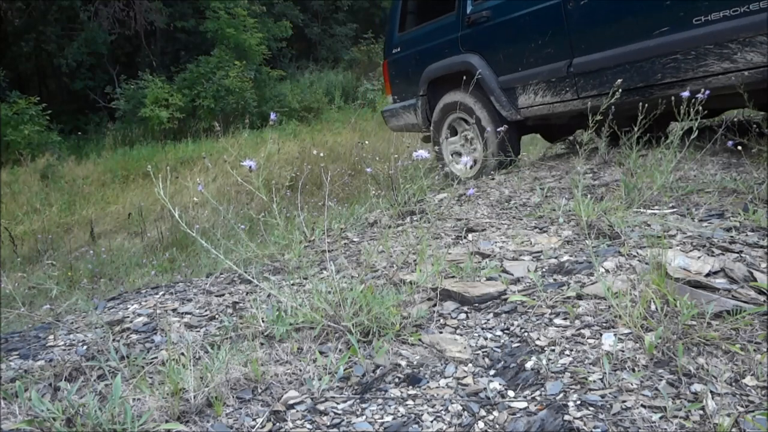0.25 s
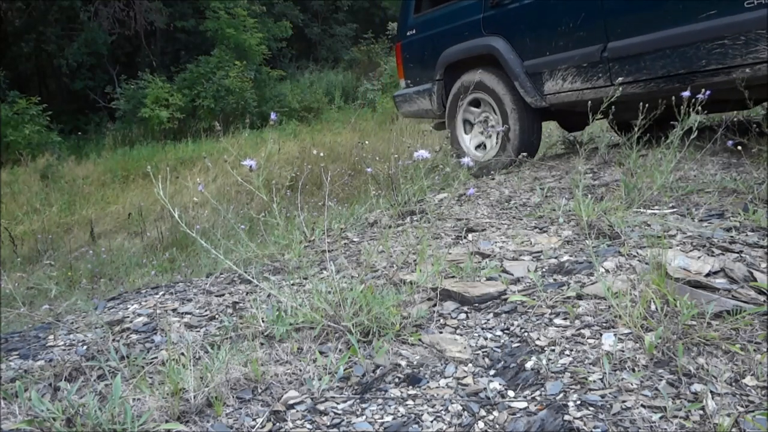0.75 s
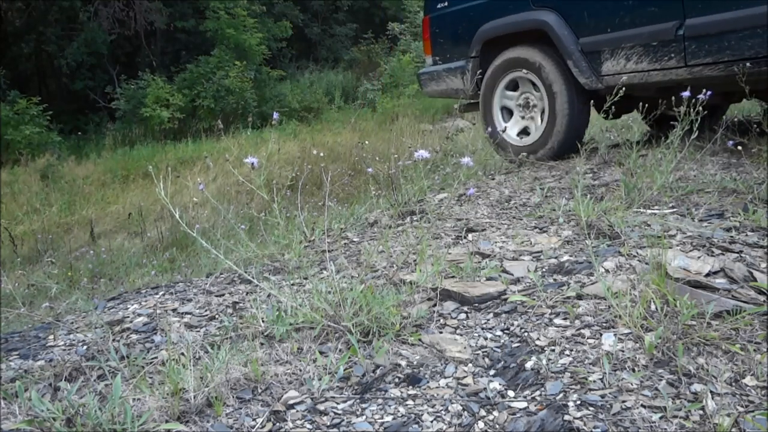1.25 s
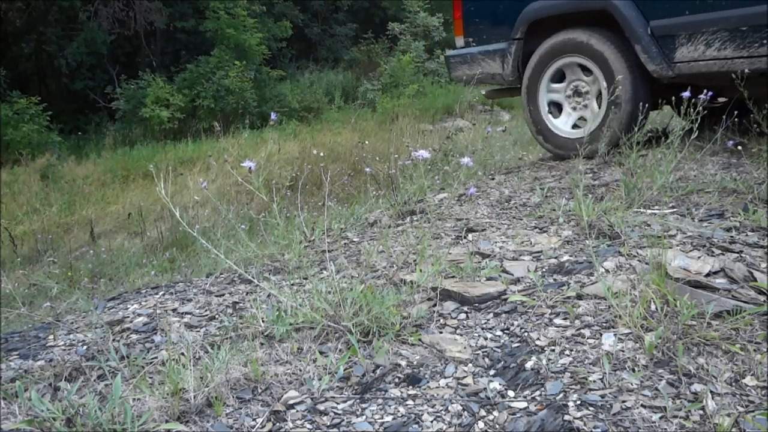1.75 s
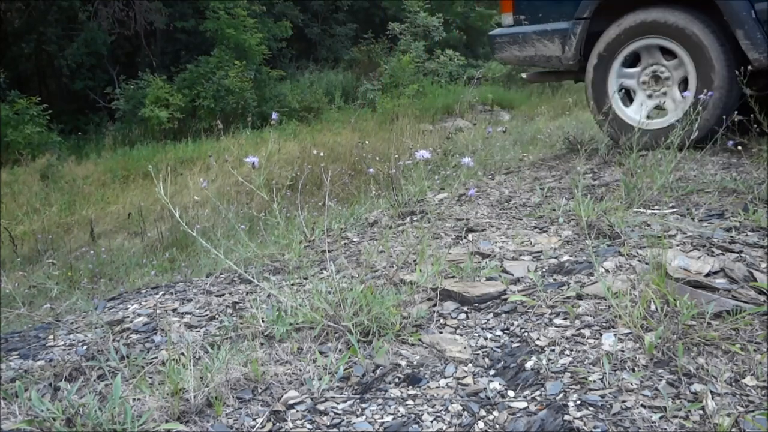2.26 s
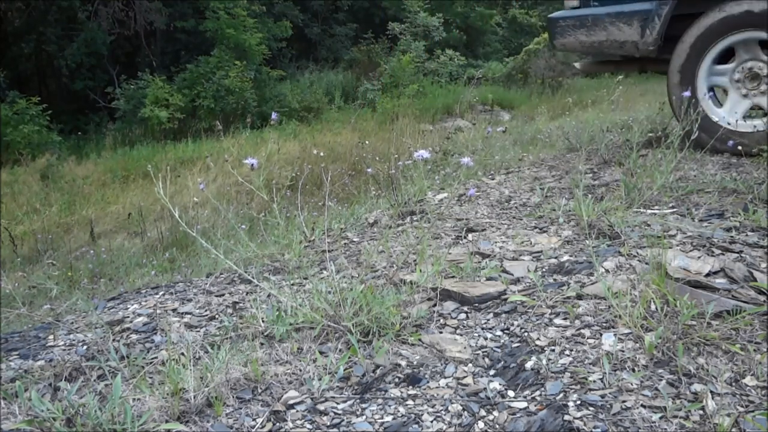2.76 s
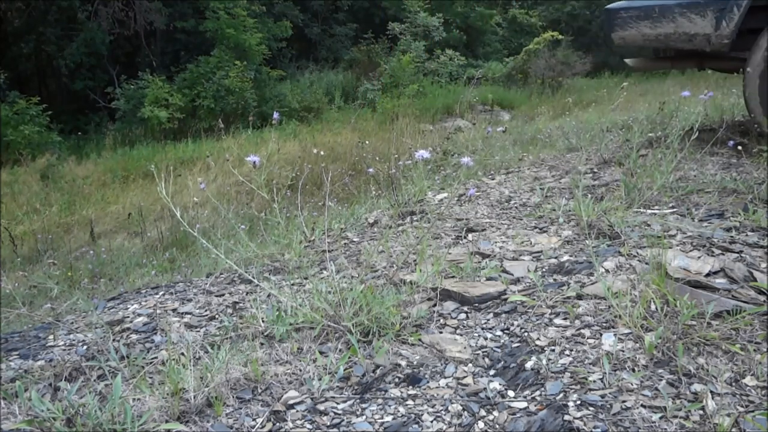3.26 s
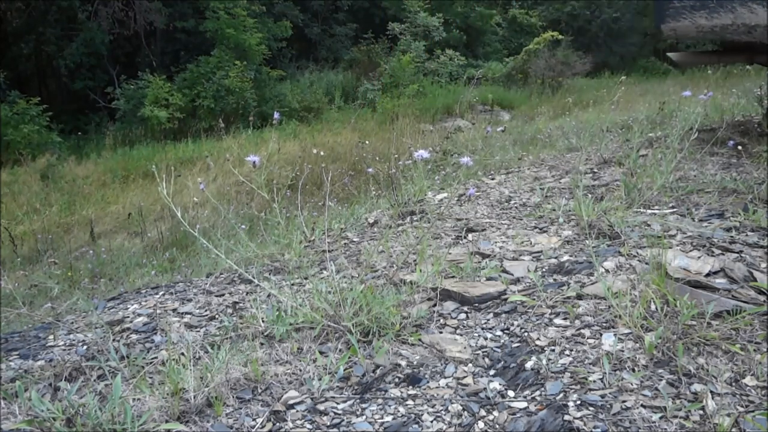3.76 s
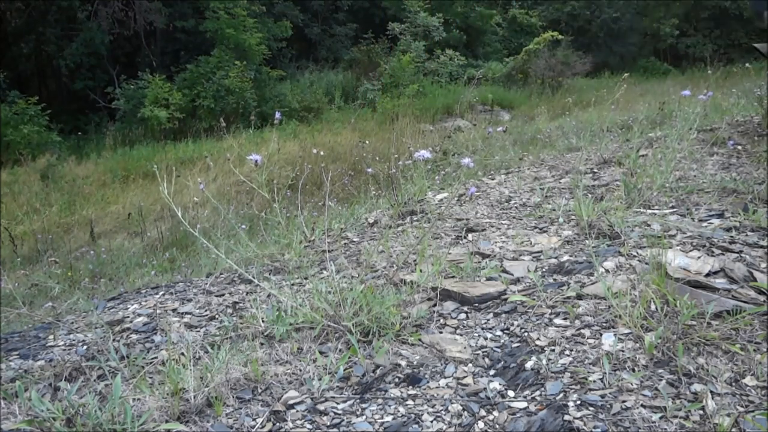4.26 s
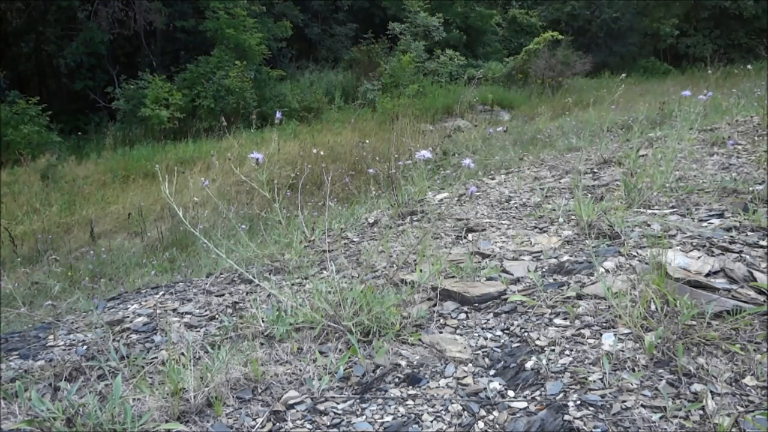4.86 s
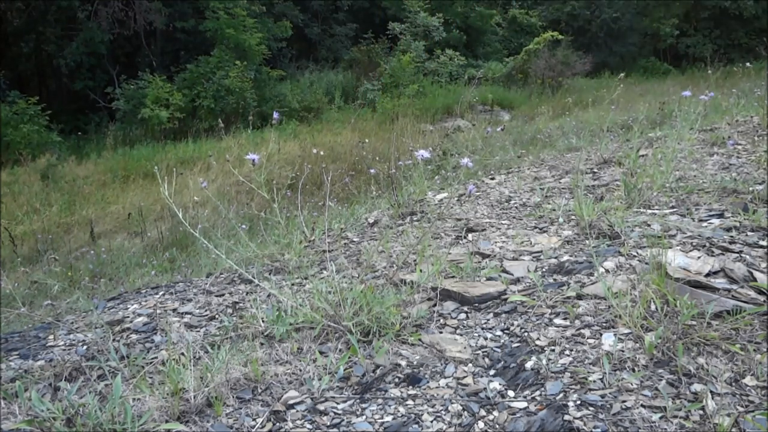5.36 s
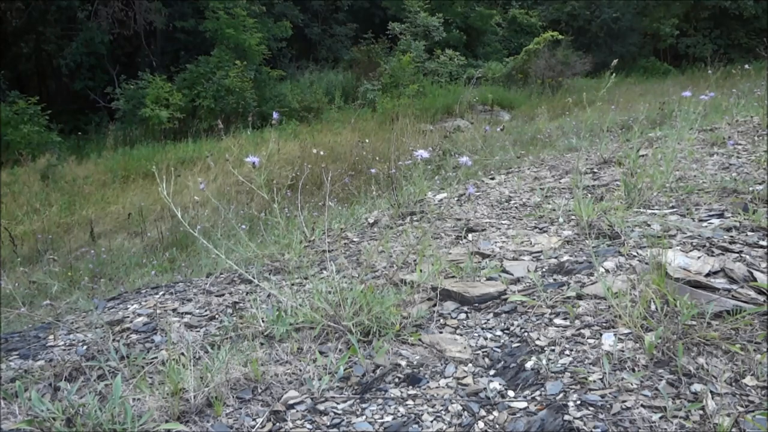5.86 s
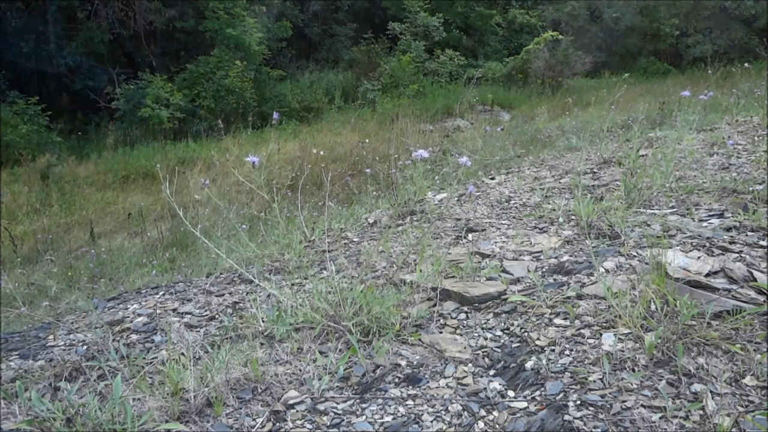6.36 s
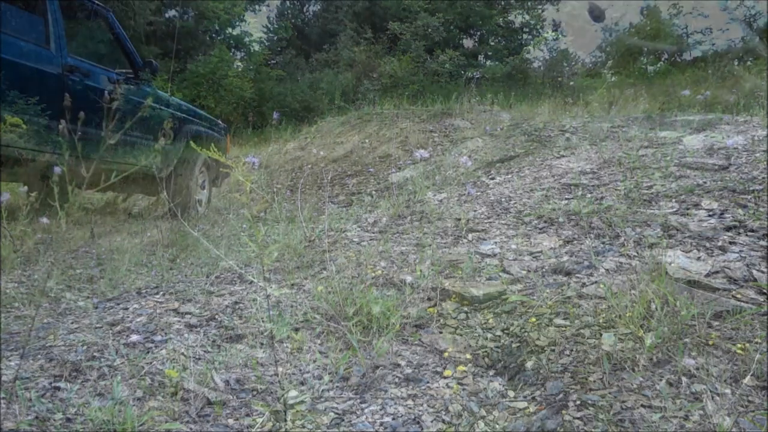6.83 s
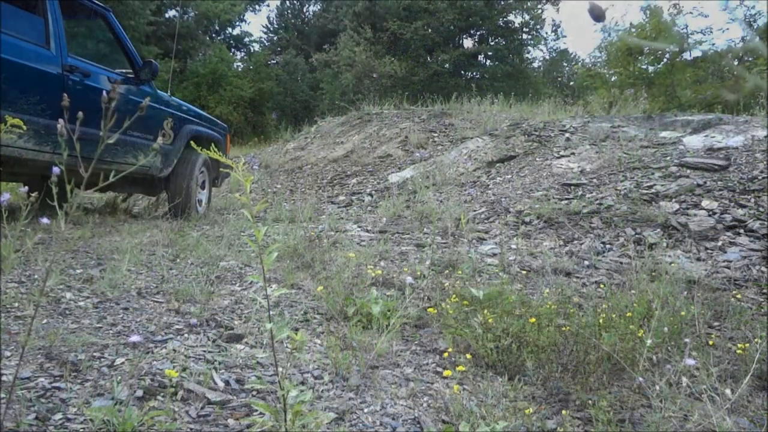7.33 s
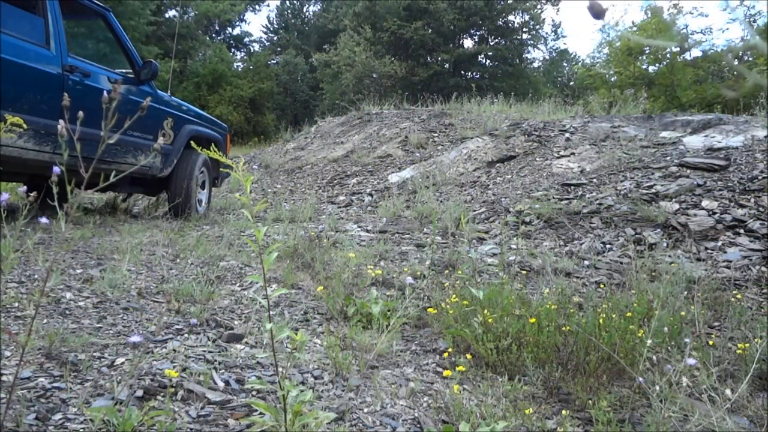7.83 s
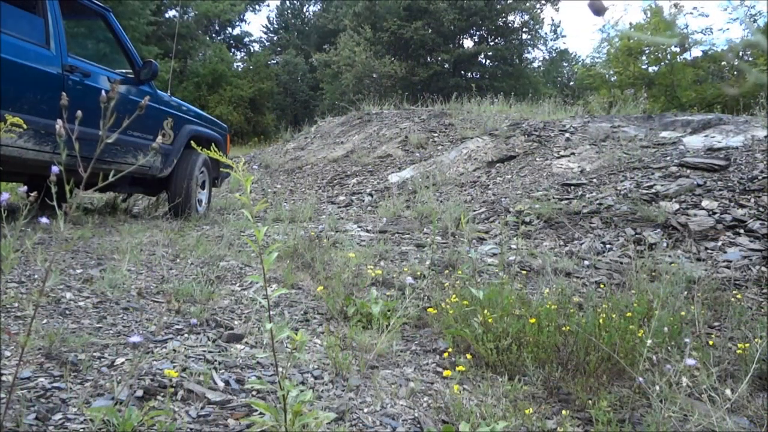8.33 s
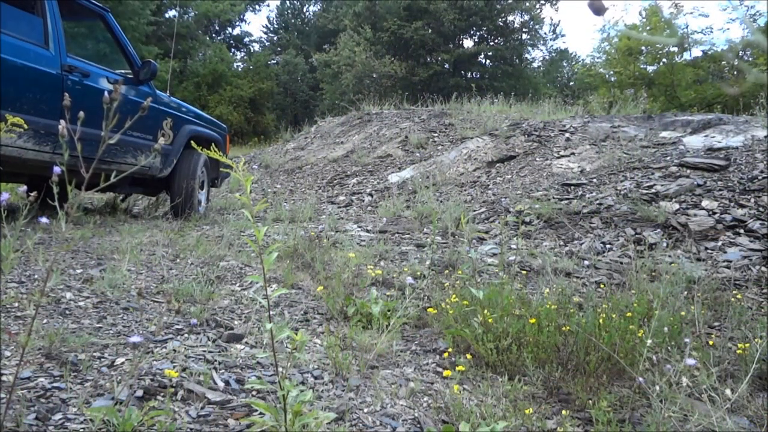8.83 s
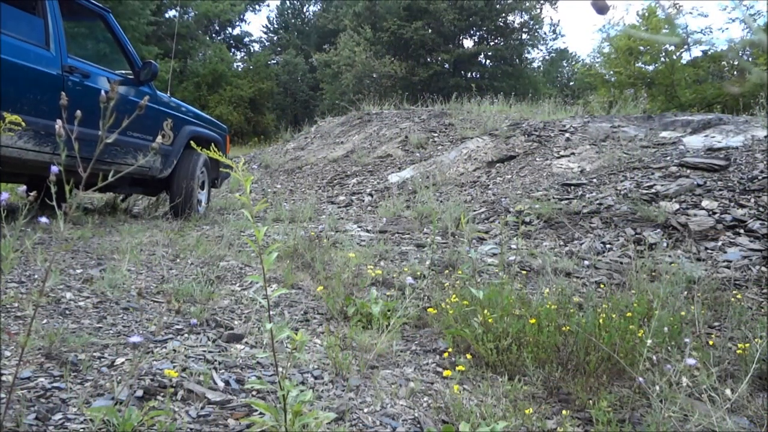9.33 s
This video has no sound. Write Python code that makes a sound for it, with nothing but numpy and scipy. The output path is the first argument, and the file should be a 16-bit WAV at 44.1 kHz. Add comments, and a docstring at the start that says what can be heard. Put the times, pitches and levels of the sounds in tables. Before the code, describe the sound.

Outdoors on loose shale, a six-cylinder engine makes a strong raspy pull, drops, then gives two throttle blips with deep exhaust boom and fan rush. Tyres crunch, stones knock and chips snap, mostly left of centre. A tiny brake squeak follows the last blip. The engine ticks over, then from about six seconds is heard from the front with belt hiss, closer and more central, ending with a clunk.

```python
"""Off-roader climbing loose shale

A six-cylinder engine makes one long pull, two blips of the throttle, then ticks over.
Trains of uneven pulses ring the exhaust; noise shaped by engine and grains makes fan rush and crunching shale.
Short noise bursts are mostly stones, with one dry tick as the climb drops out at 7.7 s.
A few sine tones make one brake squeak; a clunk of noise comes near the end.
From 6.2 s the idle is also heard from the front, with hissing belts.
"""
import sys
import numpy as np
from scipy import signal
from scipy.fft import rfft, irfft, next_fast_len
from scipy.io import wavfile
from scipy.ndimage import uniform_filter1d, map_coordinates

SR = 44100
rng = np.random.default_rng(int(sys.argv[2]) if len(sys.argv) > 2 else 0)


def int16_out(signal):
    """Quantize to a 16-bit WAV file."""
    q = np.round(np.clip(np.atleast_2d(signal).T, -1, 1) * 32767)
    wavfile.write(sys.argv[1], SR, q.astype(np.int16))


N = 422919  # length in samples

# All table levels are relative: each layer is trimmed where it is mixed.
# engine speed on the climb: time_s, firing_rate_hz
CLIMB_SPEED = [(0.0, 77), (0.27, 67.7), (0.47, 69.6), (0.85, 85.05), (1.01, 81.35), (1.37, 44.8),
               (1.56, 38.42), (1.81, 38.75), (2.01, 66.16), (2.59, 34.55), (3.18, 38.1), (3.66, 36.0),
               (3.75, 49.2), (3.89, 55.14), (4.05, 82.7), (4.38, 48.8), (4.61, 32.63), (5.04, 40.18),
               (5.62, 37.3)]
# presses of the pedal: down_s, up_s, opening (0 to 1)
PEDAL_PRESSES = [(-.3, 0.202, .6), (.31, .94, 0.88), (1.764, 2.07, 0.88), (3.667, 3.96, 0.97)]
# the cylinders in firing order: strength_db, lateness (firing intervals), both scaled by the unevenness
CYLINDERS = [(6.5, 0.016), (2.5, -0.014), (3.5, 0.0061), (5, 0.012), (3.5, -0.017), (4.5, -0.01)]
# upper notes of the exhaust pipe: pitch_hz, width_hz, level_db
PIPE_MODES = [(276, 17.8, 4.5), (333, 39, -9), (422, 48.5, -3), (547, 41, -8.5), (653, 70, -26)]
# the same pipe notes heard from the front: pitch_hz, width_hz, level_db
FRONT_PIPE_MODES = [(271.6, 21, 2.5), (327.5, 21, -8.5), (404.4, 31.4, -3.5), (424.6, 24, -11.5),
                    (504, 29, -22)]
# strength of the exhaust's boom: time_s, level_db
BOOM_LEVEL = [(0, -12), (.85, -14), (1.08, -12.5), (1.2, -21), (1.7, -22), (2.04, -12), (2.24, -17),
              (3.6, -12.5), (3.88, -13.5), (4.16, -10), (4.24, -17), (4.42, -17.5), (4.58, -24),
              (4.88, -16.5), (5.7, -14.5)]
# how levels follow the engine, one row each:
# tickover_db, full_throttle_rise_db, rise_db_per_octave of revs, beyond_crest_db, pedal_lag_s
THUMP_LAW = (-24, 14.5, -1.5, 2, 0)
RASP_LAW = (-30, 12.5, 2.2, -2, .04)
WHINE_LAW = (-37, 2, -5, -7, 0)
INTAKE_LAW = (-26.5, 14.5, 0, 3, .06)
RUSH_LAW = (-40, 3, 4.5, -5, .03)
# tone of the deep firing thump: pitch_hz, level_db
THUMP_TONE = [(20, -20.5), (36, 1), (55, 17.5), (80, 9), (95, 13), (115, -60), (200, -91.5)]
# tone of crunching shale: pitch_hz, level_db
CRUNCH_TONE = [(60, -15), (200, 6.5), (450, 1.5), (700, -2), (1100, -7), (1600, -16.5), (2500, -21),
               (6000, -59)]
# tone of the fan's rushing air: pitch_hz, level_db
RUSH_TONE = [(700, -20.5), (1300, -3.5), (1800, -0.5), (2300, -3.5), (2900, 2), (3800, -4), (5200, -3.5),
             (7000, -11.5), (9500, -16.5), (13000, -43.5)]
# tone of spraying grit: pitch_hz, level_db
GRIT_TONE = [(3000, -30), (6500, -4.5), (9700, -3.5), (12000, -7.5), (15000, -19)]
# strength of the shale crunching under the tyres: time_s, level_db
CRUNCH_LEVEL = [(0, -30), (.75, -28.5), (.97, -26.5), (1.78, -30), (1.92, -24.5), (2.58, -25), (2.74, -29),
                (4.05, -28), (4.16, -34.5), (4.45, -32.5), (4.95, -36.5), (5.6, -27)]
# strength of the grit that the tyres spray: time_s, level_db
GRIT_LEVEL = [(0, -42.5), (.3, -48), (.92, -38), (1.1, -50.5), (1.78, -53.5), (1.94, -42.5), (2.72, -53.5),
              (3.1, -47), (3.92, -53), (4.3, -47.5), (4.44, -59.5), (5.35, -68), (5.9, -55)]
# the idle heard from the front: time_s, firing_rate_hz, level_db, mutter_db
FRONT_IDLE = [(6.2, 40.37, -10.5, -35.5), (6.9, 39.9, -9, -43.5), (7.45, 40.6, -12.5, -38.5),
              (7.75, 39.65, -10.5, -40.5), (8.0, 40.69, -9.5, -39), (8.55, 40.37, -8.5, -41.5),
              (8.9, 39.05, -10, -38), (9.15, 40.22, -10, -42.5), (9.59, 40.32, -9, -38.5)]
# tone of the belts' hiss: pitch_hz, level_db
BELT_TONE = [(900, -18), (1800, -14), (2300, -10), (2900, -3), (3700, -7.5), (4400, -12.5), (5100, -8),
             (7200, -11), (8100, -4.5), (9000, -11), (11000, -18), (15500, -28)]
# singing bands of the belts and pulleys: pitch_hz, width_hz, level_db
PULLEY_BANDS = [(2633, 73, -9.5), (2840, 39, -26.5), (3024, 73, -18.5), (8080, 180, -14.5),
                (8240, 200, -18)]
# knocks, mostly stones under the tyres; the one at 7.698 s is part of a dry tick as the climb
# drops out: start_s, peak_db
KNOCKS = [(0.581, -27), (0.685, -20), (1.447, -18.5), (1.572, -16.5), (1.843, -18), (2.107, -11),
          (2.255, -13.5), (2.602, -17.5), (2.777, -19.5), (2.875, -22), (3.024, -11.5), (3.231, -16),
          (3.821, -22), (4.274, -21.5), (4.317, -16.5), (5.271, -21), (5.335, -18), (5.391, -18),
          (7.256, -23), (7.473, -18), (7.508, -18), (7.698, -22)]
# sharp ticks, mostly shale chips snapping; the one at 7.6989 s belongs to that dry tick: start_s, peak_db
TICKS = [(0.176, -19), (1.154, -22.5), (1.4574, -24), (1.5419, -26), (2.006, -17), (2.1617, -20),
         (2.2325, -17.5), (2.797, -25), (3.0241, -24), (3.4955, -20), (3.8717, -19), (4.3162, -23),
         (5.8243, -20), (5.9558, -23), (6.0734, -26.5), (6.1355, -16), (7.2564, -14), (7.6989, -23)]
# tones in the brake squeak: multiple of the lowest pitch, level_db
SQUEAK_TONES = [(1, -52), (2, -47), (3, -45), (4, -56)]
# tone of the clunk's crack: pitch_hz, level_db
CLUNK_TONE = [(300, -10), (800, 9), (1900, -26), (2900, -8), (5000, -20), (12000, -36)]
# tone of low air turbulence: pitch_hz, level_db
RUMBLE_TONE = [(15, -14), (30, -3.5), (55, -3), (85, 5.0), (130, -6), (300, -63)]

IDLE_START_S, CLIMB_END_S = 6.19, 7.7
TICKOVER_HZ, FLYWHEEL_S = 38.3, 0.1
OPEN_S, CLOSE_S = 0.14, 0.23  # how long the throttle takes to move
CREST_S, CREST_LENGTH_S = 2.96, 1.113  # going over the crest and drawing away
OVERRUN_DB = -3.5  # softening while the revs fall, for each e-fold of fall a second
BOOM_HZ, SWELL_DB = 145.8, 2  # boom swells when a harmonic of the firings meets this pitch
RUSH_FROM_CRUNCH = 0.58  # share of the crunch's swings that the rush follows
TOP_HZ = 15600


def undb(db):
    """Turn decibels into a gain."""
    return 10 ** (np.asarray(db) / 20)


def curves(table):
    """Join each column of a table by straight lines in time."""
    s, *columns = np.transpose(table)
    return [np.interp(np.arange(N) / SR, s, c) for c in columns]


def ramp(start_s, length_s):
    """A straight rise from 0 to 1."""
    return np.clip((np.arange(N) / SR - start_s) / length_s, 0, 1)


def noise():
    """White noise of about rms 1."""
    return rng.standard_normal(N)


def unit(x):
    """Scale to rms 1."""
    return x / np.sqrt(np.mean(x ** 2))


def steady(x, size=3500):
    """Even out slow swells but keep the throb; size is in samples."""
    power = uniform_filter1d(uniform_filter1d(x ** 2, size), size)
    return x / np.sqrt(power + 1e-12)


def walk(rate):
    """Random levels, `rate` a second, joined by straight lines; spread near 1."""
    position = np.arange(N) / SR * rate
    return map_coordinates(rng.standard_normal(4000), [position], order=1, mode="wrap") * 1.2


def ring(x, hz, width_hz):
    """One resonance, gain 1 at its centre."""
    return signal.lfilter(*signal.iirpeak(min(hz, SR / 2.3), hz / width_hz, fs=SR), x)


def colour(x, points):
    """Shape the tone through pitch and level points, without any sound before its cause."""
    hz, db = np.transpose(points)
    size = next_fast_len(N + 8192, True) // 2 * 2
    bins_hz = np.arange(size // 2 + 1) * SR / size
    log_gain = np.log(undb(np.interp(np.log(bins_hz + 1), np.log(hz), db)))
    # folding the cepstrum gives the filter minimum phase
    cepstrum = irfft(log_gain)
    cepstrum[1:size // 2] *= 2
    cepstrum[size // 2 + 1:] = 0
    return irfft(rfft(x, size) * np.exp(rfft(cepstrum)))[:N]


def place(x, pan_db, other=0):
    """Place a sound, left for positive pan_db; `other` is scattered sound, flipped in the right ear."""
    left = 2 / (1 + undb(-pan_db))
    return np.array([left * (x + other), (2 - left) * (x - other)])


def climbing_engine(hz):
    """Lumpy at tick-over, even when it revs; thumps and rasps under load, goes soft as revs fall."""
    overrun = np.clip(-np.gradient(np.log(hz)) * SR, 0, 2)
    thump_db = loudness(THUMP_LAW, hz) + OVERRUN_DB * overrun
    rasp_db = loudness(RASP_LAW, hz)
    boom_db = curves(BOOM_LEVEL)[0] + SWELL_DB * np.cos(2 * np.pi * BOOM_HZ / hz)
    uneven = np.clip((38 / hz) ** 1.3, 0, 1.2)
    pulses = firings(hz, uneven, scatter_db=1.2, jitter=0.007)

    thump = steady(colour(firings(hz, uneven * 0.3, scatter_db=5, jitter=0.01), THUMP_TONE))
    boom = drone(pulses, hz=142.6, width_hz=26.2, low_hz=80.65, high_hz=198.7)
    low = thump * undb(thump_db - 5.5) + boom * undb(boom_db + 2.1)

    upper = rasp(pulses, PIPE_MODES, gas=0.74 * uneven, top_hz=710) * undb(rasp_db - 4.0)
    whine = fan_whine(hz) * undb(loudness(WHINE_LAW, hz))
    upper = upper + whine + intake(pulses, loudness(INTAKE_LAW, hz))
    turbulence = rumble(np.minimum(thump_db, -22) - 13)
    return place(low, pan_db=-4.0) + place(upper, pan_db=-3.5) + turbulence, pulses


def throttle(lag_s):
    """Each press opens the throttle quickly; it closes more slowly."""
    total = 0
    for down_s, up_s, opening in PEDAL_PRESSES:
        total = total + opening * ramp(down_s + lag_s, OPEN_S) * (1 - ramp(up_s + lag_s, CLOSE_S))
    return total


def loudness(law, hz):
    """A level in dB that follows the throttle and the revs, and changes beyond the crest."""
    rest_db, throttle_db, octave_db, crest_db, lag_s = law
    engine_db = throttle_db * throttle(lag_s) + octave_db * np.log2(hz / TICKOVER_HZ)
    return rest_db + engine_db + crest_db * ramp(CREST_S, CREST_LENGTH_S)


def firings(hz, uneven, scatter_db, jitter):
    """One pulse a firing; each cylinder has its own strength and timing, and each burn varies by chance."""
    turns = np.cumsum(hz) / SR  # firings so far
    k = np.arange(int(turns[-1]))
    db, late = np.transpose(CYLINDERS)[:, k % len(CYLINDERS)]
    chance = rng.standard_normal((len(k), 2))
    lumpy = np.interp(k, turns, uneven)
    moment = k + lumpy * (late + jitter * chance[:, 0])
    at = np.interp(moment, turns, np.arange(N)).clip(0, N - 2)
    size = undb(lumpy * (db + scatter_db * chance[:, 1]))
    # share each pulse between the two nearest samples
    whole, part = at.astype(int), at % 1
    return np.bincount(whole, size * (1 - part), N) + np.bincount(whole + 1, size * part, N)


def puffs(pulses, decay_s):
    """The gas flow that jumps up at each firing and dies away."""
    return unit(signal.lfilter([1], [1, -np.exp(-1 / (decay_s * SR))], pulses))


def drone(pulses, hz, width_hz, low_hz, high_hz):
    """Pipe and silencer ring at one low pitch, so each throb swells and fades softly."""
    silencer = signal.butter(3, [low_hz, high_hz], "band", fs=SR, output="sos")
    pipe = ring(ring(pulses, hz, width_hz), hz, 2 * width_hz)
    return steady(signal.sosfilt(silencer, pipe))


def rasp(pulses, modes, gas, top_hz):
    """Firings and their turbulent gas ring the pipe's upper notes."""
    drive = unit(pulses) + gas * puffs(pulses, 0.011) * noise()
    pipe = sum(undb(db) * ring(ring(drive, hz, width), hz, 4 * width) for hz, width, db in modes)
    band = signal.butter(3, [200, top_hz], "band", fs=SR, output="sos")
    return steady(signal.sosfilt(band, pipe))


def intake(pulses, level_db):
    """Each gulp of air growls and hisses: noise pulsing with the firings."""
    flow = puffs(pulses, 0.013)
    growl = unit(ring(ring(flow * noise(), 580, 370), 640, 700))
    hiss = unit(ring(ring(flow * noise(), 2680, 1100), 2700, 1600))
    return (undb(-23.0) * growl + undb(-34.5) * hiss) * undb(level_db)


def fan_whine(hz):
    """A belt-driven blade tone at 8.42 times the firing rate, wavering in strength."""
    tone = np.sqrt(2) * np.sin(2 * np.pi * np.cumsum(8.42 * hz) / SR)
    return tone * undb(2 * walk(10))


def tyres_and_fan(hz, pulses):
    """Shale crunches and spits grit; as the engine revs, pulsing air fills the gaps between grains."""
    (crunch_db,), (grit_db,) = curves(CRUNCH_LEVEL), curves(GRIT_LEVEL)
    rush_db = loudness(RUSH_LAW, hz) + RUSH_FROM_CRUNCH * (crunch_db - crunch_db.mean())
    revs = np.clip(hz / 85, 0, 1)
    air = revs * puffs(pulses, 0.036)
    loose = 1.2 - revs  # single grains stand out more at low revs
    crunch_grains = loose * grains(rate=170, spread_db=-1.5, decay_s=0.0069)
    rush_grains = loose * grains(rate=200, spread_db=4.5, decay_s=0.0015)
    grit_grains = loose * grains(rate=79, spread_db=5.5, decay_s=0.00072)
    crunch = unit(np.hypot(air, 0.65 * crunch_grains))
    rush = unit(np.hypot(0.53 + 0.14 * air, 0.5 * rush_grains))
    grit = unit(np.hypot(0.8, grit_grains))
    rolling_db = -9 * ramp(6.15, 0.27)  # the wheels come to rest
    layers = [(crunch, crunch_db - 0.3, CRUNCH_TONE, 0.3),
              (rush, rush_db - 2.0, RUSH_TONE, 0.33),
              (grit, grit_db + 0.53, GRIT_TONE, 0.55)]
    out = 0
    for texture, db, tone, wide in layers:
        mid, side = (unit(colour(texture * noise(), tone)) * undb(db + rolling_db) for _ in range(2))
        out = out + place(mid, pan_db=-7.0, other=wide * side)
    return out


def grains(rate, spread_db, decay_s):
    """The loudness outline of tiny fractures of very unequal size, each dying away quickly."""
    sizes = undb(spread_db * np.minimum(rng.exponential(size=N), 4))
    hits = (rng.random(N) < rate / SR) * sizes
    power = signal.lfilter([1], [1, -np.exp(-2 / (decay_s * SR))], hits ** 2)
    return np.sqrt(power / power.mean())


def idling_engine():
    """The same six cylinders from the front, with the mutter of the engine bay."""
    hz, db, mutter_db = curves(FRONT_IDLE)
    pulses = firings(hz, np.full(N, 1.05), scatter_db=2.0, jitter=0.014)
    thump = steady(colour(firings(hz, np.full(N, 0.25), scatter_db=3, jitter=0.01), THUMP_TONE))
    boom = drone(pulses, hz=138.4, width_hz=30.7, low_hz=95.59, high_hz=190.72)
    low = boom + undb(-15.0) * thump
    upper = undb(-14.5) * rasp(pulses, FRONT_PIPE_MODES, gas=1.0, top_hz=567.4)
    upper = upper + undb(-34.5) * fan_whine(hz)
    engine = (place(low, pan_db=-1.36) + place(upper, pan_db=4.5)) * undb(db)
    mid, side = (unit(colour(noise(), CRUNCH_TONE)) * undb(mutter_db + 5.0 + 0.71 * walk(13))
                 for _ in range(2))
    mutter = place(mid, pan_db=0.5, other=0.76 * side)
    return engine + mutter + rumble(level_db=-40.5)


def belts(level_db, pan_db):
    """Belts and pulleys: a flickering hiss with a few singing bands of noise."""
    hiss = unit(colour(noise(), BELT_TONE))
    sing = 0
    for hz, width, db in PULLEY_BANDS:
        band = unit(ring(ring(noise(), hz, width), hz, 2 * width))
        sing = sing + undb(db + 2 * walk(12)) * band
    scattered = 0.3 * unit(colour(noise(), RUSH_TONE))
    return place((hiss + sing) * undb(walk(45)), pan_db, scattered) * undb(level_db)


def knocks_and_ticks(table, hz, decay_s, width, pan_db):
    """Each hit cracks and rings broadly for a moment: a noise burst through a wide resonance."""
    out, t = np.zeros((2, N + SR)), np.arange(SR // 8) / SR
    fade = np.exp(-t / decay_s) + 0.3 * np.exp(-t / (4 * decay_s))
    for s, db in table:
        blow = fade * rng.standard_normal(len(t))
        hit = ring(ring(blow, hz, min(width * hz, SR / 3)), hz, min(2 * width * hz, SR / 3))
        start = int(s * SR)
        spot_db = pan_db + 2 * rng.standard_normal()
        out[:, start:start + len(t)] += place(hit * undb(db) / abs(hit).max(), spot_db)
    return out[:, :N]


def pebbles():
    """Small stones shift and clack at random, louder where the shale crunches more."""
    clacks = grains(rate=30, spread_db=2.5, decay_s=0.0083) * noise()
    body = unit(ring(ring(clacks, 730, 560), 810, 1500))
    level_db = curves(CRUNCH_LEVEL)[0] - 9.5 - 11 * ramp(6.1, 0.2)
    return place(body * undb(level_db), pan_db=-13.5)


def brake_squeak():
    """A pad sings briefly as the vehicle is held; the lowest tone lingers."""
    pitch_hz = 1819 * (1 + 0.002 * walk(150))
    phase = 2 * np.pi * np.cumsum(pitch_hz) / SR
    bite = ramp(4.568, 0.014) * (1 - ramp(4.62, 0.035))
    linger = ramp(4.566, 0.009) * (1 - ramp(4.6, 0.22))
    tones = sum(undb(db) * np.sin(round(k) * phase) for k, db in SQUEAK_TONES)
    squeak = bite * tones + undb(-45) * linger * np.sin(phase)
    return place(squeak * undb(2 * walk(54)), pan_db=-9)


def clunk():
    """A clunk from the body: a sharp crack and a short hollow ring."""
    age = np.arange(N) / SR - 9.555  # seconds since the blow
    crack = unit(colour(noise(), CLUNK_TONE)) * np.exp(-abs(age) / 0.0096)
    hollow = unit(ring(noise(), 850, 164) + ring(noise(), 1150, 181.4)) * np.exp(-abs(age) / 0.032)
    return place((age > 0) * (undb(-15.5) * crack + undb(-24) * hollow), pan_db=2.5)


def rumble(level_db):
    """Low air turbulence: deep noise, partly different at each ear."""
    mid, side = (unit(colour(noise(), RUMBLE_TONE)) for _ in range(2))
    return place(mid, pan_db=-6, other=1.3 * side) * undb(level_db)


def scene():
    """Mix the climb, the overlapping idle, and the small events."""
    # the flywheel rounds every change of speed
    hz = uniform_filter1d(curves(CLIMB_SPEED)[0], int(FLYWHEEL_S * SR), mode="nearest")
    engine, pulses = climbing_engine(hz)
    climb = engine + tyres_and_fan(hz, pulses) + pebbles() + belts(level_db=-53.5, pan_db=-8)
    idle = idling_engine() + belts(level_db=-43.6, pan_db=1.0)
    knocks = undb(0.5) * knocks_and_ticks(KNOCKS, hz=660, decay_s=0.003, width=0.47, pan_db=-10.5)
    ticks = undb(-1.5) * knocks_and_ticks(TICKS, hz=4560, decay_s=0.0021, width=1.0, pan_db=-9)
    engines = climb * (1 - ramp(CLIMB_END_S, 0.02)) + idle * ramp(IDLE_START_S, 0.018)
    return engines + knocks + ticks + brake_squeak() + clunk()


def record(dry):
    """Round off the loudest peaks near full scale and cut the top of the treble."""
    rounded = dry / (1 + dry ** 16) ** (1 / 16)
    return signal.sosfilt(signal.ellip(8, 0.2, 70, TOP_HZ, fs=SR, output="sos"), rounded)


dry = scene()
out = record(dry)
int16_out(out)
```